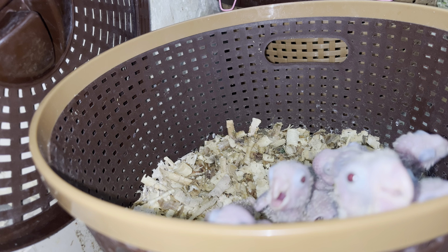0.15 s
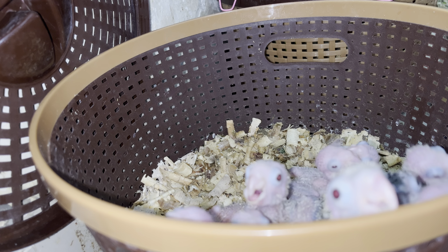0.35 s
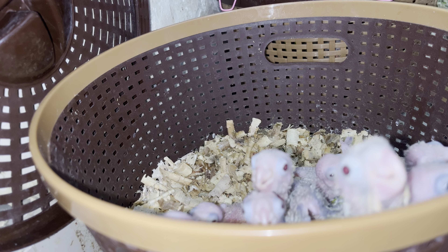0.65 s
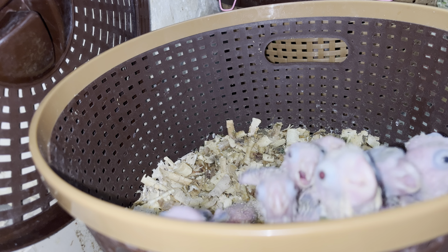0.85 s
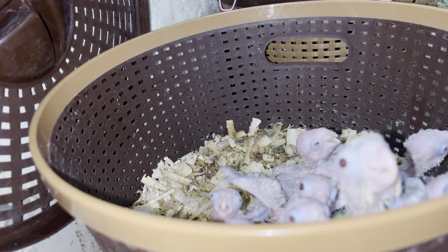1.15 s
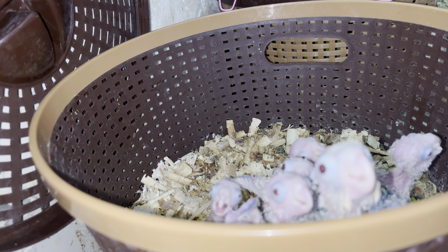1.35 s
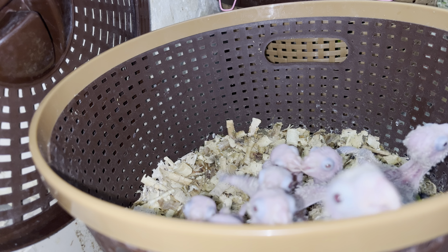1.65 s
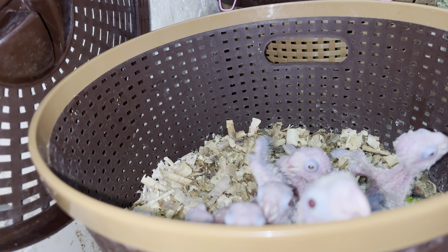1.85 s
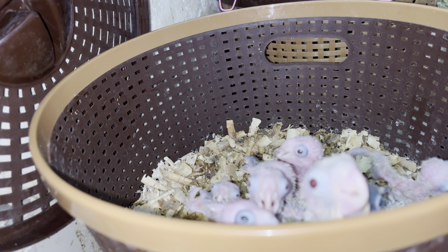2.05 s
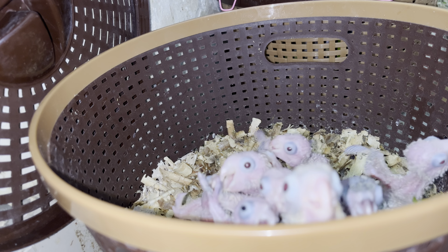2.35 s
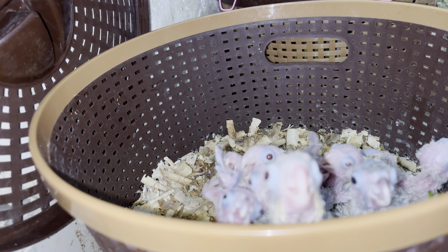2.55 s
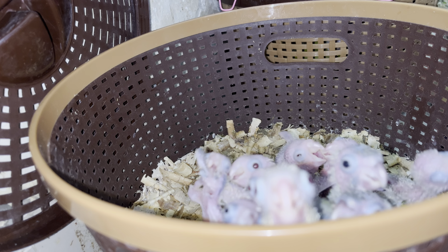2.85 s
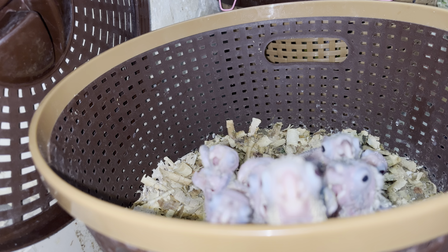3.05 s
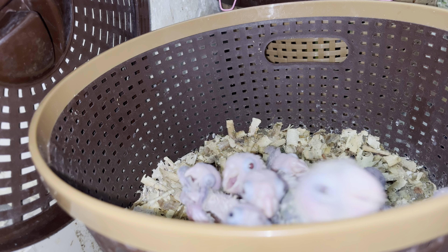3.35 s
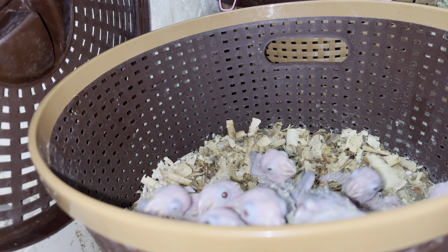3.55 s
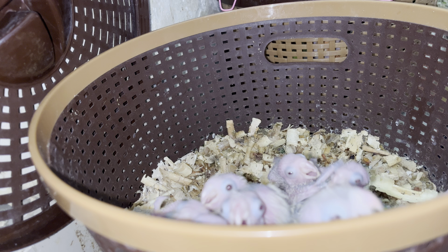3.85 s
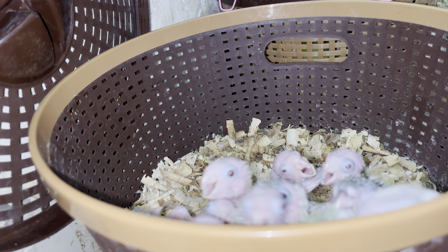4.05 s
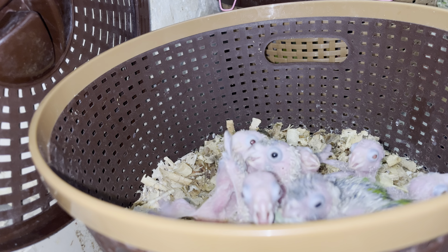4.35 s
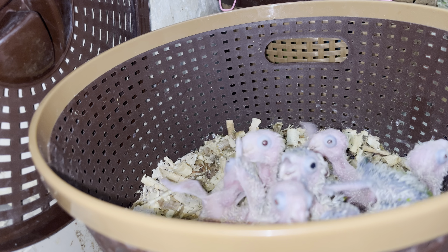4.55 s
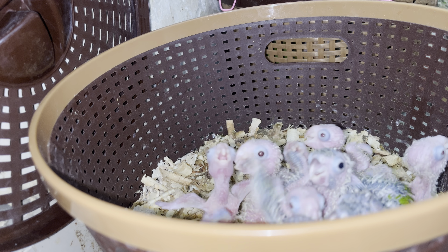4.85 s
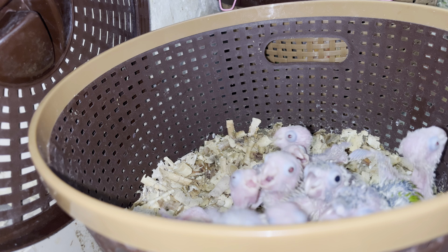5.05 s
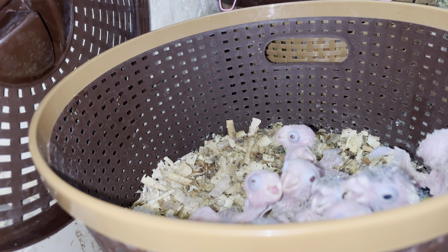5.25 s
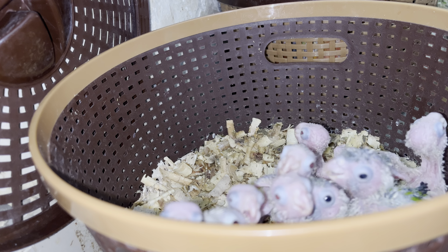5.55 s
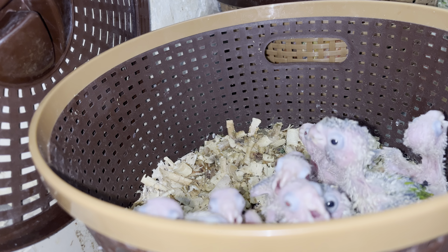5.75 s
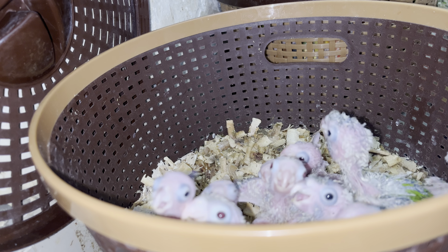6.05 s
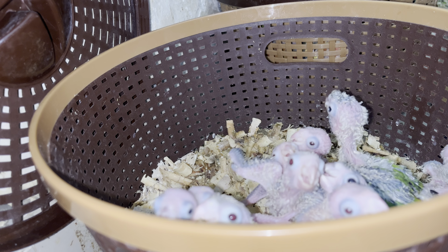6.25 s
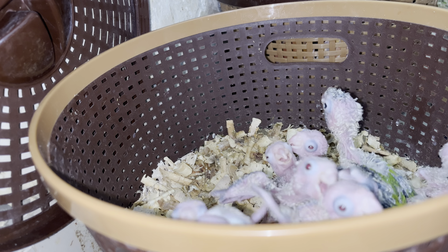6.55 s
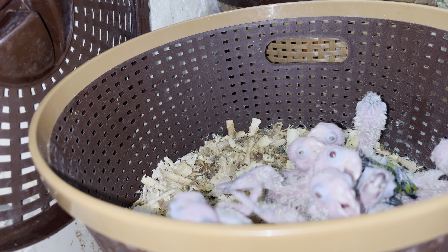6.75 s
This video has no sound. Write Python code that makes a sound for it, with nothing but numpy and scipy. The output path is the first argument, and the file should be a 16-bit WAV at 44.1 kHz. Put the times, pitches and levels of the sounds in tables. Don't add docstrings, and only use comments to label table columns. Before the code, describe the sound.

Close, frantic begging chatter of baby parrots, hoarse and raspy, with rapid peeps, high whistles and cracked squawks over a faint low hum.

```python
import sys
import numpy as np
from scipy import signal
from scipy.fft import rfft, irfft, next_fast_len
from scipy.io import wavfile
from scipy.ndimage import map_coordinates

SR = 44100
rng = np.random.default_rng(int(sys.argv[2]) if len(sys.argv) > 2 else 0)


def bounce(signal):
    frames = np.transpose(np.atleast_2d(signal))
    limited = np.clip(frames, -1, 1)
    pcm = np.round(limited * 32767).astype(np.int16)
    wavfile.write(sys.argv[1], SR, pcm)


def boost_factor(decibels):
    exponent = np.asarray(decibels, float) / 20
    return 10 ** exponent


N = 304290

# frequency_hz, density_db (per Hz)
NOISE_SPECTRUM = [(15, -96), (25, -51.5), (46, -22), (70, -12.5), (88, -18), (99, -9), (308, -18.5),
                  (357, -22.5), (805, -22), (957, -21), (9000, -46.5), (11700, -77.5), (19800, -120)]
# frequency_hz, correlation (0 to 1)
NOISE_LIKENESS = [(60, 0.9), (130, 1), (300, 0.58), (700, 0.034)]
# time_s, level_db
HUM_LEVEL = [
    (0.0, -55.5),
    (1.11, -62),
    (1.32, -58),
    (3.86, -61.5),
    (4.67, -58.5),
    (5.19, -68),
    (5.53, -56),
    (5.98, -71.5),
    (6.15, -61),
    (6.9, -68),
]
HUM_HZ = 70.3

# frequency_hz, gain_db
CHEEP_THROAT = [(1000, -12), (1700, -6), (2500, -8), (3400, -2), (5000, -2), (6500, -5), (8500, -14),
                (12000, -13), (15000, -32)]
# start_s, length_s, middle_pitch_hz, level_db
SWEEPS = [(0.03, 0.014, 1325, -28), (0.126, 0.026, 1232, -26), (0.165, 0.019, 1490, -31.5),
          (0.799, 0.029, 1131, -26), (1.381, 0.0065, 1390, -30), (1.827, 0.023, 1327, -32),
          (1.976, 0.014, 1236, -27), (2.938, 0.024, 1300, -36), (2.969, 0.018, 1375, -24),
          (3.062, 0.017, 1230, -30.5), (3.621, 0.014, 1383, -37.5), (3.718, 0.018, 1370, -33),
          (3.975, 0.062, 1490, -28.5), (4.08, 0.052, 1805, -34), (4.755, 0.012, 1445, -32),
          (5.583, .036, 1620, -31.5), (5.822, 0.032, 1564, -30.5), (6.393, 0.024, 1350, -32),
          (6.587, .025, 1275, -35)]
# start_s, length_s, middle_pitch_hz, level_db
STEPS = [
    (2.241, 0.093, 1620, -28.5),
    (2.395, 0.095, 1608, -26.5),
    (2.552, 0.035, 1557, -33),
    (3.143, 0.045, 1620, -33),
    (5.663, 0.046, 1580, -34.5),
    (5.937, .05, 1482, -34),
]
# start_s, length_s, middle_pitch_hz, level_db
BOWS = [(0.226, 0.05, 1643, -30.5), (0.289, 0.077, 1700, -27), (.41, 0.066, 1580, -30),
        (0.54, 0.062, 1397, -29), (0.91, 0.047, 1617, -25.5), (1.03, .058, 1640, -26),
        (1.384, .068, 1677, -23.5), (1.488, 0.058, 1695, -28), (1.593, 0.052, 1760, -28.5),
        (1.693, 0.052, 1726, -32), (2.33, 0.044, 1580, -27.5), (3.082, 0.051, 1810, -28.5),
        (3.481, 0.052, 1607, -30), (3.868, 0.059, 1910, -35), (4.336, .084, 1840, -32.5),
        (4.467, 0.061, 1883, -35), (4.782, 0.057, 1733, -29.5), (5.026, 0.055, 1602, -31.5),
        (5.69, 0.056, 1887, -31), (5.756, 0.067, 1704, -27), (5.857, 0.061, 1952, -34),
        (6.488, 0.061, 1584, -29)]
# start_s, length_s, middle_pitch_hz, level_db
PEEPS = [
    (0.195, 0.027, 1700, -33),
    (2.866, 0.026, 1350, -32),
    (3.252, 0.047, 1675, -24),
    (4.104, 0.058, 1666, -33),
    (5.086, .034, 2310, -28),
]
# start_s, length_s, top_pitch_hz, level_db
MEWS = [(0.195, 0.059, 2190, -32.5), (0.336, 0.027, 2067, -32.5), (0.437, 0.042, 2185, -29.5),
        (0.67, .06, 2110, -31.5), (1.598, 0.042, 2166, -31), (1.66, 0.043, 2187, -41.5),
        (2.25, 0.085, 2274, -26), (2.957, 0.039, 2320, -29.5), (3.078, .038, 2335, -33),
        (5.772, 0.05, 2300, -34), (6.079, .046, 2084, -47.5), (6.134, 0.079, 2320, -38),
        (6.555, 0.03, 2330, -38)]

# frequency_hz, gain_db
WHISTLE_COLOUR = [(4500, -4), (5700, 4), (6300, 1), (6800, -7), (7500, -2), (11500, 7), (14000, 0),
                  (15500, -10)]
# start_s, length_s, top_pitch_hz, level_db
LOW_WHISTLES = [(.046, 0.055, 5396, -25), (.208, 0.067, 6100, -25.5), (.42, .06, 5730, -23.5),
                (1.395, 0.052, 6560, -17), (1.635, 0.044, 6100, -18), (1.805, 0.061, 6650, -30),
                (2.152, 0.05, 6440, -19), (2.985, 0.047, 6220, -20), (3.096, 0.035, 6610, -25),
                (3.228, 0.034, 5860, -20), (3.915, 0.042, 6600, -27.5), (4.055, 0.077, 6450, -27.5),
                (4.162, 0.048, 5960, -24.5), (4.77, 0.035, 5640, -19.5), (4.905, 0.051, 5840, -22),
                (5.606, 0.052, 6160, -23.5), (5.76, 0.049, 6600, -31), (6.425, 0.031, 5980, -18.5)]
# start_s, length_s, top_pitch_hz, level_db
HIGH_WHISTLES = [(.095, 0.075, 7640, -29), (.364, .062, 7200, -26.5), (1.003, 0.055, 7600, -32),
                 (1.125, 0.055, 7400, -31), (1.276, 0.064, 7300, -27), (2.0, 0.1, 7600, -35.5),
                 (2.118, 0.07, 7270, -29), (2.832, 0.091, 7520, -29), (3.165, 0.04, 7500, -34),
                 (3.73, 0.028, 7050, -34), (3.787, 0.061, 7450, -26.5), (4.105, 0.071, 7000, -39.5),
                 (5.678, 0.051, 7420, -27.5), (5.795, 0.042, 7180, -22), (5.932, 0.047, 6930, -28),
                 (6.503, 0.037, 6900, -44), (6.74, 0.039, 7000, -34)]
# start_s, length_s, top_pitch_hz, level_db
FLAT_WHISTLES = [
    (4.336, 0.17, 5350, -26.5),
    (5.845, 0.036, 5800, -19.5),
    (5.672, 0.034, 5600, -26.5),
    (6.412, 0.074, 4510, -30),
    (6.63, 0.05, 7916, -33.5),
    (6.83, 0.077, 4350, -27.5),
]
# start_s, length_s, first_hz, middle_hz, last_hz, level_db
CLIMB = [
    (4.66, .042, 4860, 6030, 6800, -23),
    (4.7, 0.017, 6770, 6270, 4940, -24),
]

# frequency_hz, gain_db
HOARSE_THROAT = [(700, -33.5), (1500, -16.5), (2550, -15.5), (3350, -8.5), (5000, -1.5), (6300, -11),
                 (7300, -29), (9000, -24), (11000, -45.5)]
# frequency_hz, gain_db
HISS = [(4000, -31), (7000, 3), (8500, -11.5), (11000, -4), (12700, -10.5), (14000, -7.5), (14900, -35)]
# start_s, length_s, first_effort_db, last_effort_db
BOUTS = [(0.06, 0.18, -33.5, -21.5), (0.243, 0.39, -26, -29.5), (0.672, 0.1, -38.5, -27.5),
         (0.832, 0.26, -25.5, -24.5), (1.161, 0.074, -28, -31), (1.283, 0.042, -28.5, -35.5),
         (1.382, .06, -36.5, -30), (1.482, 0.23, -30, -29.5), (1.809, 0.23, -22.5, -31.5),
         (1.99, 0.64, -21.5, -25), (2.701, 0.44, -24.5, -32), (3.07, 0.17, -29, -28),
         (3.227, 0.21, -29, -20.5), (3.63, 0.13, -27, -27), (3.763, .36, -24.5, -26.5),
         (4.143, 0.44, -23.5, -31), (4.7, 0.18, -34.5, -26.5), (4.899, .29, -27.5, -29.5),
         (5.664, 0.33, -34.5, -29), (6.109, 0.25, -33, -45), (6.31, 0.54, -28.5, -20.5)]
# start_s, length_s, hiss_db
GAPES = [(0.062, 0.11, -38), (0.138, 0.12, -28), (0.541, 0.072, -38), (0.888, 0.088, -31),
         (1.025, 0.089, -32), (1.164, 0.054, -35), (1.289, 0.0083, -32), (1.828, 0.077, -30),
         (1.948, 0.11, -30.5), (2.13, 0.21, -34.5), (2.29, 0.064, -33), (2.54, 0.054, -32),
         (2.698, 0.16, -46), (3.222, 0.082, -33.5), (3.356, 0.059, -28.5), (3.646, 0.029, -30),
         (3.726, 0.077, -27), (3.878, 0.057, -30), (3.961, 0.21, -30.5), (4.262, 0.17, -27.5),
         (4.505, 0.038, -30.5), (4.705, .16, -31.5), (4.909, 0.26, -31.5), (5.089, 0.15, -49.5),
         (5.77, 0.22, -32), (6.085, 0.15, -49), (6.338, 0.17, -40), (6.504, .07, -36), (6.582, 0.18, -30),
         (6.8, 0.14, -33.5)]

# frequency_hz, gain_db
SQUAWK_THROAT = [(1000, -31), (2000, -13), (3000, -5), (4000, 0), (5000, -9), (6000, -6), (8000, -23),
                 (10000, -33), (15000, -60)]
# start_s, length_s, middle_pitch_hz, level_db
DARK = [
    (.545, 0.067, 2020, -27.5),
    (1.005, 0.05, 1816, -22.5),
    (2.437, 0.034, 1942, -18.5),
    (3.222, 0.11, 1886, -16),
    (4.885, 0.078, 1913, -12.5),
]
DARK_ENDS = (0.99, 0.95)
# start_s, length_s, first_pitch_hz, held_pitch_hz, level_db
SPLIT = [
    (0.77, 0.24, 1954, 1985, -20),
    (1.82, 0.26, 2079, 1949, -21.5),
    (3.25, 0.19, 1866, 2038, -20.5),
    (3.62, 0.22, 2216, 2071, -22.5),
    (4.165, .265, 1851, 2024, -19.5),
    (4.93, 0.18, 1960, 2021, -22),
    (6.33, 0.21, 1898, 1980, -24.5),
]
# start_s, length_s, first_pitch_hz, held_pitch_hz, level_db
CLEAR = [
    (1.155, 0.098, 1686, 1976, -25),
    (2.495, 0.11, 2395, 2065, -21.5),
    (2.712, 0.19, 2165, 2184, -23),
    (6.274, 0.12, 1900, 1889, -32.5),
    (6.5, 0.201, 1937, 1896, -25),
    (6.7, 0.21, 2177, 2092, -23),
]
# start_s, end_s, peak_db
TRILLS = [
    (4.5534, 4.57, -42),
    (4.607, 4.65, -42),
    (4.696, 4.85, -31),
]

# frequency_hz, t60_s
BASKET_DECAY = [(1000, 0.11), (9000, 0.11)]
# frequency_hz, t60_s
ROOM_DECAY = [(1000, 0.4), (4000, 0.34), (6200, 0.33), (7000, 0.26), (12000, 0.089)]
# frequency_hz, gain_db
SCATTERED_RIGHT = [(1000, -0.5), (2400, 4), (4400, -7.5), (7000, -2), (9000, -2), (12000, -10.5)]
# frequency_hz, gain_db
DIRECT_RIGHT = [(1000, -5.5), (2400, -49.5), (4400, -44), (7000, -29), (9000, -50.5)]
# frequency_hz, gain_db
SHARED_TREBLE = [(3500, -66.5), (6000, -46), (7500, -19), (9000, 0.5), (15000, -1.5)]


def unit(x):
    return x / np.sqrt(np.mean(x ** 2) + 1e-20)


def along(points, hz):
    f, v = np.transpose(points)
    return np.interp(np.log(hz + 1), np.log(f + 1), v)


def wobble(rate, size):
    knots = rng.standard_normal(int(size * rate / SR) + 4)
    return map_coordinates(knots, [np.arange(size) * rate / SR])


def filtered(x, response):
    m = next_fast_len(N + SR // 2)
    return irfft(rfft(x, m) * response(np.fft.rfftfreq(m, 1 / SR)), m)[..., :N]


def add(track, s, x):
    part = track[round(s * SR):][:len(x)]
    part += x[:len(part)]


def voice(hz, strengths, throat):
    k = np.arange(1, len(strengths) + 1)[:, None]
    turns = k * np.cumsum(hz) / SR + rng.random((len(k), 1))
    audible = k * hz < .4 * SR
    loudness = strengths * boost_factor(along(throat, k * hz)) * audible
    return unit(np.sum(loudness * np.sin(2 * np.pi * turns), axis=0))


def ends(rows, first, last):
    return [(s, length, first * hz, hz, last * hz, db) for s, length, hz, db in rows]


def arches(calls, strengths, throat, flutter_db, edge, plateau, jitter):
    out = np.zeros(N)
    for s, length, first, middle, last, db in calls:
        u = np.linspace(-1, 1, round(length * SR))
        bend = np.sign(u) * abs(u) ** plateau
        hz = first ** (bend * (bend - 1) / 2) * middle ** (1 - bend * bend) * last ** (bend * (bend + 1) / 2)
        hz = hz * (1 + jitter * wobble(505.2, size=len(u)))
        flutter = boost_factor(flutter_db * np.array([wobble(140, size=len(u)) for _ in strengths]))
        swell = np.clip((1 - abs(u)) / edge, 0, 1)
        add(out, s, boost_factor(db) * swell * voice(hz, boost_factor(strengths)[:, None] * flutter, throat))
    return out


def background():
    def spectrum(hz):
        angle = np.arccos(np.clip(along(NOISE_LIKENESS, hz), -1, 1)) / 2
        return boost_factor(along(NOISE_SPECTRUM, hz)) * [np.cos(angle), np.sin(angle)]

    mid, side = filtered(rng.standard_normal((2, N)), spectrum)
    noise = boost_factor(-61.0) * unit(np.array([mid + side, mid - side]))
    t = np.arange(N) / SR
    turns = 2 * np.pi * np.cumsum(HUM_HZ + 1.5 * wobble(7.0, size=N)) / SR
    hum_db = np.interp(t, *np.transpose(HUM_LEVEL)) + 4.0 + 1.8 * wobble(11, size=N)
    hum = boost_factor(hum_db) * (np.sin(turns) + 0.38 * np.sin(2 * turns))
    return (noise + hum) * boost_factor([[.8], [-.8]])


def cheeps():
    rich = ends(SWEEPS, 0.72, 1.3) + ends(STEPS, 0.62, 0.91) + ends(PEEPS, 0.97, 0.95)
    bows, mews = ends(BOWS, .58, 0.59), ends(MEWS, .86, .86)
    low_line = np.array([5, 0, 0, -2, -2])
    out = arches(rich, np.zeros(9), CHEEP_THROAT, flutter_db=4, edge=.25, plateau=1.05, jitter=.003)
    out += arches(bows, np.zeros(8), CHEEP_THROAT, flutter_db=2.5, edge=.2, plateau=1.9, jitter=.005)
    return out + arches(mews, low_line, CHEEP_THROAT, flutter_db=4, edge=.3, plateau=1, jitter=.012)


def whistles():
    lower = ends(LOW_WHISTLES, .8, .8) + CLIMB
    pure = ends(HIGH_WHISTLES, .68, .68) + ends(FLAT_WHISTLES, .97, .96)
    out = arches(pure, np.array([0, -16]), WHISTLE_COLOUR, flutter_db=4, edge=.3, plateau=1.6, jitter=.007)
    return out + arches(lower, np.array([0, -23]), WHISTLE_COLOUR, flutter_db=4, edge=.3, plateau=.95,
                        jitter=.008)


def crowd(count):
    s, length, middle, rise, fall = rng.random((count, 5)).T
    s = (np.arange(count) + s) / count * (N / SR - .01)
    length = .03 + .04 * length
    middle = 1300 + 900 * middle
    calls = np.transpose([s, length, middle * (1 - .3 * rise), middle, middle * (1 - 0.1723 * fall), 0 * s])
    throat = [(1200, -9), (3000, 0)]  # frequency_hz, gain_db
    return arches(calls, np.zeros(9), throat, flutter_db=4, edge=.3, plateau=1.2, jitter=.036)


def plateau_db(s, length, rise, fall):
    t = np.arange(N) / SR
    return -rise * np.maximum(s - t, 0) - fall * np.maximum(t - s - length, 0)


def rasp():
    breath = rng.standard_normal(N) * boost_factor(2.5 * wobble(300, size=N))
    source = unit(crowd(count=190)) + boost_factor(-6) * breath
    hoarse = unit(filtered(source, lambda hz: boost_factor(along(HOARSE_THROAT, hz))))
    hiss = unit(filtered(source, lambda hz: boost_factor(along(HISS, hz))))
    t = np.arange(N) / SR
    opening, hiss_db, effort = np.full((3, N), -200.)
    cheep_gapes = [(s, length + 0.006, -37 + 0.62 * (db + 26.0))
                   for s, length, _, db in SWEEPS + STEPS + BOWS + PEEPS + MEWS]
    for s, length, db in GAPES + cheep_gapes:
        shape = plateau_db(s, length, rise=870, fall=720)
        opening = np.maximum(opening, shape)
        hiss_db = np.maximum(hiss_db, db - 3.5 + shape)
    for s, length, first, last in BOUTS:
        held = np.interp(t, [s, s + length], [first, last])
        effort = np.maximum(effort, held + plateau_db(s, length, rise=803.5, fall=218.5))
    return boost_factor(effort + 2.0) * (0.38 + 0.71 * boost_factor(opening)) * hoarse + boost_factor(hiss_db) * hiss


def hoots():
    calls = ends(DARK, *DARK_ENDS)
    overtones_db = np.array([2, 8.5, 0, -2, -2])
    return arches(calls, overtones_db, SQUAWK_THROAT, flutter_db=2, edge=.4, plateau=1.3, jitter=.004)


def squawks():
    out = np.zeros(N)
    swell, glide = 0.42, .4
    line = np.arange(1, 15)[:, None]
    odd = line % 2
    depth_db = np.minimum(.9 * line, 3.8)
    for rows, split in ((SPLIT, 0.33), (CLEAR, 0.063)):
        for s, length, first, held, peak_db in rows:
            t = np.arange(round(length * SR)) / SR
            u = t / length
            rise_db, fade_db = 6 * (1 - u / swell), 8.5 * ((u - swell) / (1 - swell))
            db = peak_db - np.maximum(rise_db, fade_db)
            half = np.clip(split + 0.39 * (peak_db - db) / 10, 0, 1)
            hz = held + (first - held) * np.clip(1 - u / glide, 0, 1)
            hz = hz * (1 + .012 * wobble(260, size=len(t)))
            own = np.array([wobble(166.4, size=len(t)) for _ in odd])
            flutter = boost_factor(depth_db * (0.067 * own + wobble(162.3, size=len(t))))
            edges = np.clip(np.minimum(t, length - t) / 0.021, 0, 1)
            lines = (1 - odd + odd * half) * flutter
            add(out, s, boost_factor(db + 6.0) * edges * voice(hz / 2, lines, SQUAWK_THROAT))
    return out


def trill():
    out, t = np.zeros(N), np.arange(520) / SR
    gap_s = 0.015
    pulses = [(s, db) for start, end, db in TRILLS for s in np.arange(start, end, gap_s)]
    for s, db in pulses + rng.normal(0, [.0006, 3], (len(pulses), 2)):
        resonances_hz = np.array([2750, 4100, 5600]) * rng.normal(1, 0.073)
        ring = sum(g * np.sin(2 * np.pi * hz * t) for g, hz in zip((1.5, .7, .7), resonances_hz))
        puff = np.convolve(rng.standard_normal(len(t)), [.6, .5, 0, -.5, -.6], 'same')
        decay = boost_factor(db + 5 - 60 * t / .014) * (1 - np.exp(-t / .001))
        add(out, s - .001, decay * (1.2 * ring + puff))
    return out


def knock():
    out, t = np.zeros(N), np.arange(3000) / SR
    add(out, 4.641, boost_factor(-34 - 60 * t / 0.28) * rng.standard_normal(len(t)))
    return filtered(out, lambda hz: (hz / 600) / (1 + (hz / 800) ** 4))


def tail(decays, seconds, channels):
    hz, t, z = signal.stft(rng.standard_normal((channels, round(SR * seconds))), SR, nperseg=128)
    x = signal.istft(z * boost_factor(-60 * t / along(decays, hz)[:, None]), SR, nperseg=128)[1]
    return x / np.linalg.norm(x[0])


def echoes(x, decays, seconds, channels, size):
    out = np.zeros((channels, N + SR * 2))
    padded = np.pad(x, (size, 2 * size))
    for start in range(0, N + size, size):
        piece = padded[start:start + 2 * size] * np.hanning(2 * size)
        wet = signal.fftconvolve(piece[None], tail(decays, seconds, channels), axes=1)
        out[:, start:start + wet.shape[1]] += wet
    return out[:, size:size + N]


def right_port(small, big, birds):
    scattered = echoes(birds, BASKET_DECAY, 0.11, channels=1, size=3000)[0]
    right = filtered(scattered, lambda hz: boost_factor(along(SCATTERED_RIGHT, hz) - 3.5))
    # gain in dB, lag in s
    for x, db, lag in ((small, 6.5, -.0007), (big, -3.5, .0008)):
        right += filtered(x, lambda hz: boost_factor(along(DIRECT_RIGHT, hz) + db) * np.exp(-2j * np.pi * hz * lag))
    return right + filtered(birds, lambda hz: boost_factor(along(SHARED_TREBLE, hz)) * np.exp(1j * 1.4))


def scene():
    floor = background()
    small = cheeps() + whistles() + trill()
    big = hoots() + squawks()
    birds = small + big + rasp()
    right = right_port(small, big, birds)
    delayed = np.pad(birds, (400, 0))[:N]
    room = echoes(delayed, ROOM_DECAY, 0.65, channels=2, size=9000)
    return np.array([birds, right]) + boost_factor([[-7], [-13]]) * room + floor + knock()


def band_limit(x):
    return signal.sosfilt(signal.butter(12, 15760, fs=SR, output="sos"), x)


def record(dry):
    soft = dry / (1 + abs(dry / .98) ** 12) ** (1 / 12)
    mix = filtered(soft, lambda hz: hz < 15760)
    return band_limit(mix)


dry = scene()
out = record(dry)
bounce(out)
```